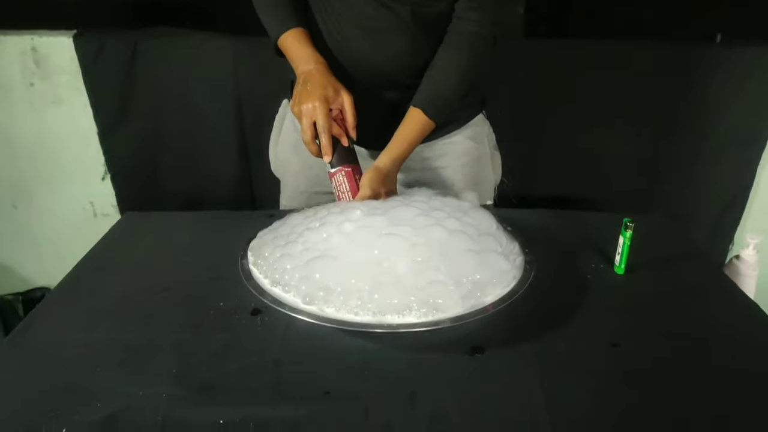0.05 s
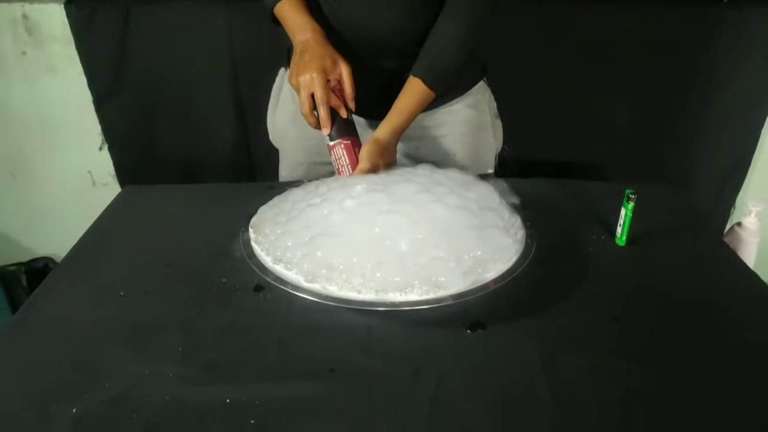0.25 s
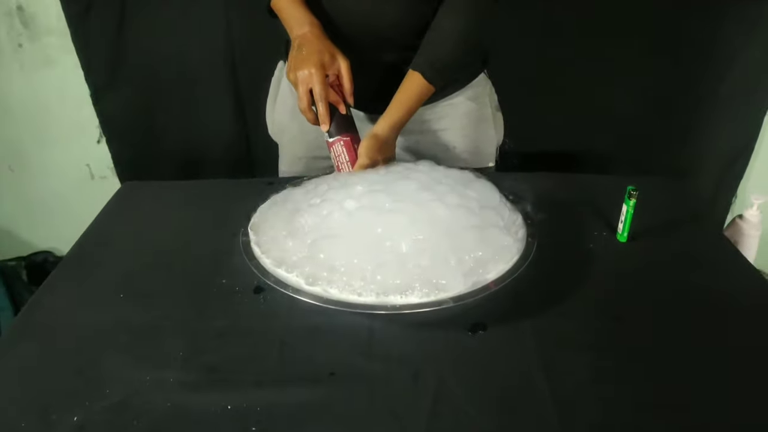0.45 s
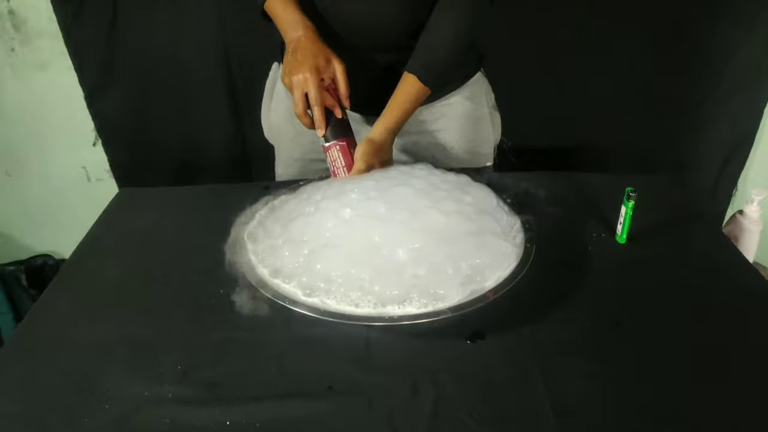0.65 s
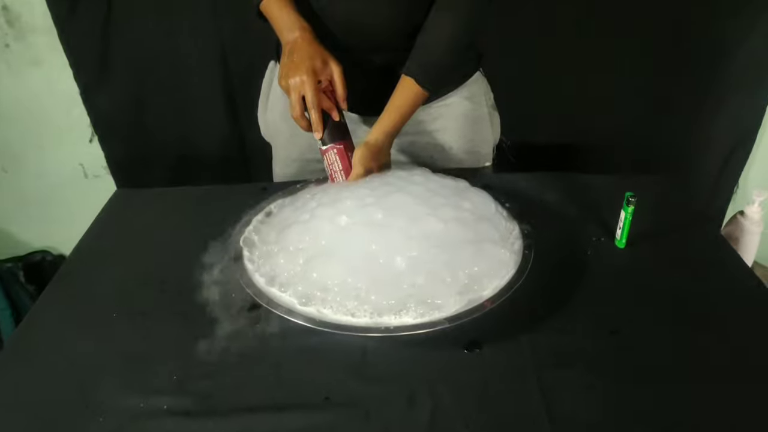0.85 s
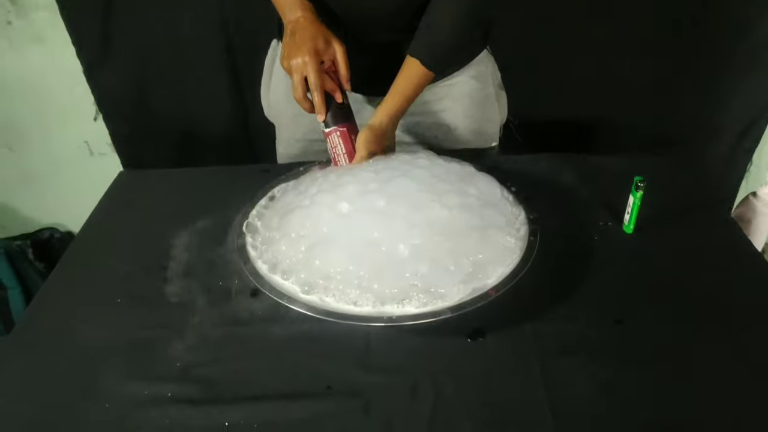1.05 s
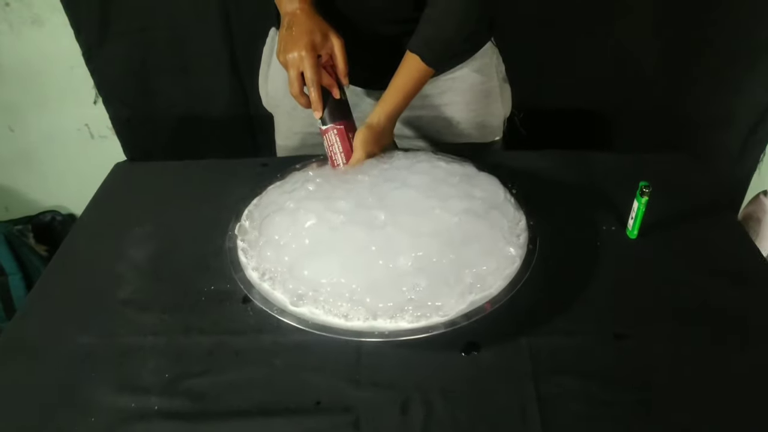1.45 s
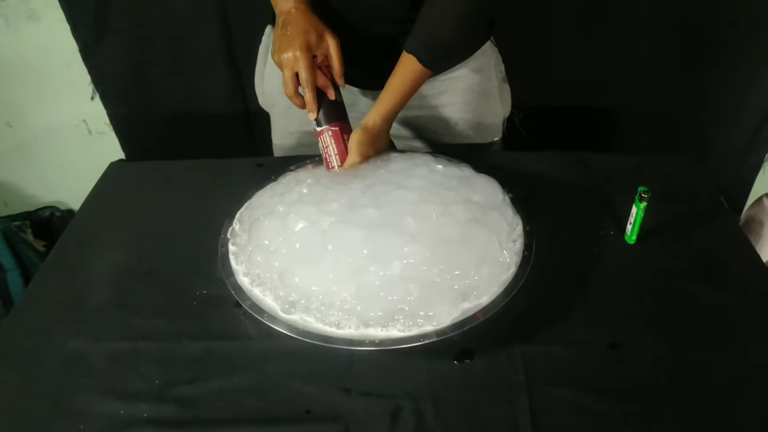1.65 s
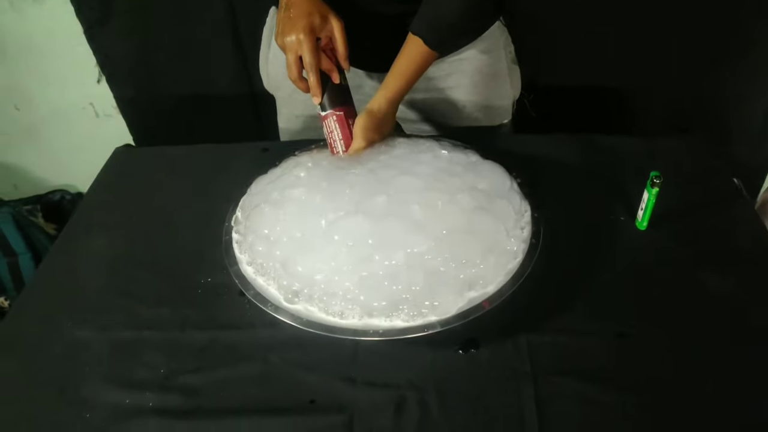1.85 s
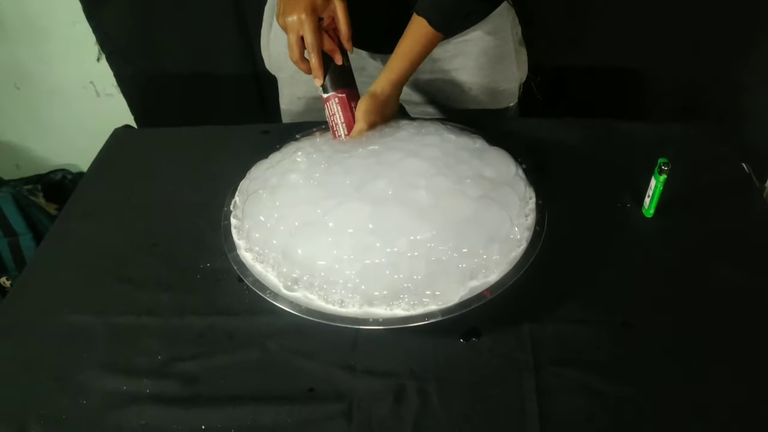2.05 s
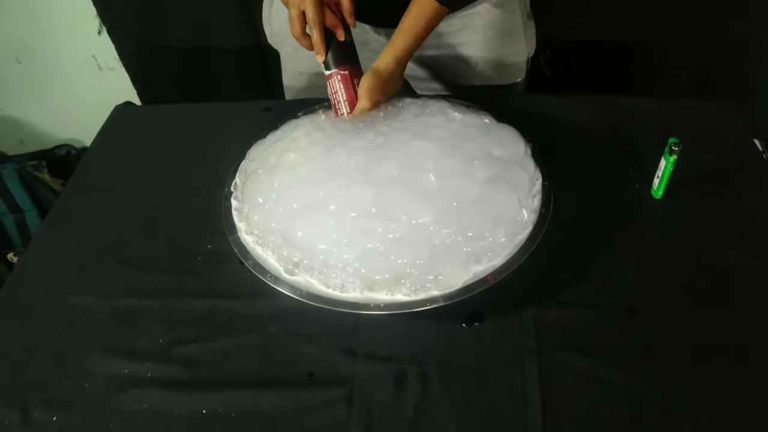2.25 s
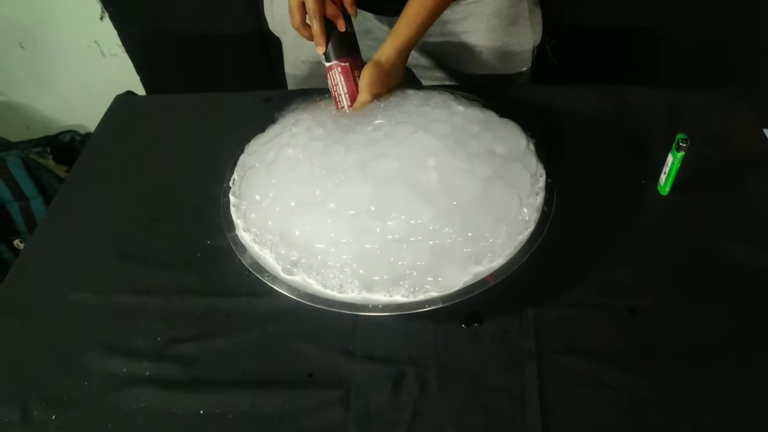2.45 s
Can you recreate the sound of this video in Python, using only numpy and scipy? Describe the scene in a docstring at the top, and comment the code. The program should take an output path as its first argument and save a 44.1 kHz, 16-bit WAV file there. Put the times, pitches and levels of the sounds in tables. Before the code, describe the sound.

Dense bubbling gurgle as gas from a can blows into a tray of soapy foam.

```python
"""A dense gurgle of bubbles, blown by gas from a can held nozzle down in a tray of soapy foam.
The jet hisses first, then its puffs ring a gas pocket under the foam while bubbles of all sizes
churn and glug. Now and then the gas spurts through the surface with a falling squelch.
Soap films pop, and the collapsing foam keeps fizzing after the gas stops.
The small room adds a short, dull tail and a faint rumble."""
import sys
import numpy as np
from scipy import signal
from scipy.io import wavfile
from scipy.ndimage import uniform_filter1d

SR = 44100
rng = np.random.default_rng(int(sys.argv[2]) if len(sys.argv) > 2 else 0)


def generate_wav(signal):
    """Clip the signal to [-1, 1] and save it as 16-bit WAV at the path in sys.argv[1]."""
    frames = np.transpose(np.atleast_2d(signal))
    scaled = np.clip(frames, -1, 1) * 32767
    pcm = np.round(scaled).astype(np.int16)
    wavfile.write(sys.argv[1], SR, pcm)


N = 114660
T = np.arange(N) / SR

# Envelopes are fader rides, colours are EQ curves; all their levels are relative.
# swells of the large bubbles and the gas pocket: (time [s], level [dB])
GURGLE_ENVELOPE = [(0.23, -53), (0.26, -28.5), (0.29, -21), (0.46, -21), (0.47, -24), (0.6, -21.5),
                   (0.63, -25.5), (0.68, -20.5), (0.72, -30.5), (0.77, -23.5), (0.81, -30), (0.88, -23),
                   (0.91, -33.5), (0.96, -28), (0.97, -24), (1.01, -39.5), (1.04, -20.5), (1.07, -44),
                   (1.1, -24.5), (1.15, -31.5), (1.22, -20), (1.3, -24), (1.32, -19), (1.34, -25.5),
                   (1.36, -19), (1.44, -31.5), (1.48, -23), (1.5, -35), (1.53, -26), (1.54, -40),
                   (1.7, -33.5), (1.72, -43), (1.75, -30.5), (1.86, -28), (1.88, -34), (1.92, -27),
                   (1.93, -28.5), (2.3, -23.5), (2.34, -27), (2.36, -47), (2.38, -42), (2.41, -65)]
# round body of the large bubbles: (frequency [Hz], level [dB])
GURGLE_EQ = [(220, -22), (310, -8), (400, -1.5), (470, -4.5), (560, 3.5), (660, -3), (760, -3.5)]
# resonances of the gas pocket under the foam: (centre pitch [Hz], relative level [dB], t60 [s])
POCKET_MODES = [(407, -0.5, 0.026), (553.5, 1, 0.035), (688, -7.5, 0.058), (990, -13, 0.02)]
# single large bubbles: (time [s], level [dB], starting pitch [Hz], t60 [s])
GLUG_CUES = [(0.124, -29, 614, 0.025), (0.278, -18, 620, 0.039), (0.667, -18, 550, 0.032),
             (0.871, -15.5, 536, 0.065), (0.970, -13.5, 590, 0.031), (1.312, -22, 544, 0.088),
             (1.359, -14, 600, 0.054), (1.642, -21, 760, .035), (1.693, -23, 754, 0.02),
             (2.143, -15.5, 793, 0.035), (2.262, -15, 435, 0.15), (2.375, -25, 614, 0.036)]
# surges of the middle-sized bubbles: (time [s], level [dB])
BURBLE_ENVELOPE = [(0.19, -61), (0.27, -33), (0.42, -26), (0.45, -38), (0.49, -27), (0.64, -30.5),
                   (0.7, -34.5), (0.75, -26), (0.8, -46), (0.89, -30), (1.04, -33.5), (1.07, -43.5),
                   (1.12, -30.5), (1.14, -49), (1.16, -33.5), (1.28, -29.5), (1.33, -40), (1.35, -28),
                   (1.38, -37), (1.52, -33), (1.54, -55), (1.65, -39), (1.8, -44.5), (1.83, -28.5),
                   (1.86, -40), (1.9, -30.5), (1.94, -49), (1.99, -31), (2.12, -45), (2.14, -33),
                   (2.18, -37), (2.29, -30), (2.38, -45.5), (2.41, -65)]
# midrange of those bubbles: (frequency [Hz], level [dB])
BURBLE_EQ = [(760, 5), (1030, 6), (1160, -6.5), (1330, -7.5)]
# churn of the small bubbles around the nozzle: (time [s], level [dB])
FROTH_ENVELOPE = [(0.15, -81), (0.22, -37), (0.32, -29), (0.33, -27.5), (0.37, -37.5), (0.38, -26),
                  (0.41, -32.5), (0.52, -30), (0.53, -37), (0.56, -29), (0.64, -37.5), (0.65, -31.5),
                  (0.71, -45), (0.74, -32), (0.99, -38.5), (1.03, -29.5), (1.07, -49), (1.09, -44),
                  (1.11, -33.5), (1.14, -45), (1.26, -34.5), (1.43, -40.5), (1.45, -33), (1.47, -47),
                  (1.52, -35), (1.53, -61.5), (1.55, -46), (1.58, -57.5), (1.74, -40), (1.75, -39.5),
                  (1.8, -44), (1.82, -38), (1.95, -43.5), (1.96, -34.5), (1.99, -44.5), (2.03, -34.5),
                  (2.05, -43), (2.2, -33), (2.21, -50), (2.23, -36.5), (2.32, -38), (2.42, -73.5)]
# bright edge of the small bubbles: (frequency [Hz], level [dB])
FROTH_EQ = [(1100, -3), (1400, -4), (1750, 3), (2100, -1.5), (2700, -7.5), (3200, -8.5), (3700, -16)]
# gas breaking the surface: (time [s], level [dB], starting pitch [Hz], length [s])
SPURT_CUES = [(0.177, -42.5, 1900, 0.014), (0.315, -29, 1913, 0.037), (0.372, -32, 1870, 0.017),
              (0.546, -27, 1850, 0.037), (0.805, -37, 1983, .025), (0.868, -32, 2590, 0.016),
              (0.935, -37, 2570, 0.02), (1.015, -35, 2240, .035), (1.102, -35.5, 2300, 0.015),
              (1.267, -36.5, 2500, .03), (1.341, -31, 1210, 0.024), (1.436, -31, 1950, 0.021),
              (1.45, -32, 1150, 0.01), (1.5, -38, 1855, 0.015), (1.511, -35, 2430, 0.015),
              (1.537, -47, 1880, .033), (1.745, -35, 2100, 0.0085), (1.76, -38, 2410, 0.015),
              (1.811, -36, 2070, 0.025), (2.023, -36, 1770, 0.013), (2.178, -36.5, 2020, .028)]
# push of the gas jet: (time [s], level [dB])
JET_ENVELOPE = [(0.122, -94), (0.131, -65.5), (0.17, -59), (0.22, -44), (0.265, -41), (0.30, -47),
                (0.45, -46), (0.58, -49), (0.66, -50), (0.71, -55), (0.75, -48.5), (0.81, -48), (0.88, -48),
                (0.93, -51), (1.04, -49), (1.07, -53.5), (1.11, -48), (1.17, -50.5), (1.39, -48),
                (1.52, -56), (1.54, -66), (1.65, -66), (1.73, -54.5), (1.79, -56), (1.84, -53.5),
                (1.89, -54.5), (2.02, -55), (2.2, -51.5), (2.32, -53.5), (2.37, -77), (2.41, -87)]
# airy hiss of the jet: (frequency [Hz], level [dB])
JET_EQ = [(900, -9.5), (1800, -1.5), (2700, 1.5), (4000, 0), (5300, 0), (6200, -4), (8000, -7.5),
          (10000, -16.5), (12000, -21), (13000, -31), (14500, -34)]
# soap films bursting: (time [s], level [dB], pitch [Hz])
POP_CUES = [(0.035, -54.5, 7500), (0.780, -32.5, 7600), (0.796, -41.5, 8200), (1.051, -51, 11000),
            (1.738, -41, 7850), (1.834, -35.5, 8650), (1.849, -47, 9800), (1.963, -31.5, 6100),
            (1.994, -35, 4500), (2.227, -24.5, 2920), (2.277, -35, 7600), (2.348, -39.5, 5900),
            (2.355, -34.5, 5060), (2.375, -50, 10500), (2.403, -46, 7600), (2.411, -40.5, 3340),
            (2.427, -41, 2420), (2.444, -39, 5300), (2.471, -43.5, 4730)]
# bed of collapsing foam: (time [s], level [dB])
FIZZ_ENVELOPE = [(0.12, -85), (0.3, -53), (1.5, -58.5), (2.0, -60), (2.42, -55.5), (2.5, -59.5),
                 (2.6, -61.5)]
# sparkle of the tiny bubbles: (frequency [Hz], level [dB])
FIZZ_EQ = [(1100, 7), (2000, 7), (3000, 3.5), (5500, -6), (8000, -5.5), (10000, -12), (12000, -22)]
# rise and fall of the room's rumble: (time [s], level [dB])
RUMBLE_ENVELOPE = [(0, -47), (0.2, -46), (0.45, -39), (0.7, -41.5), (1.1, -39.5), (1.6, -43), (2.3, -40.5),
                   (2.6, -53)]
# low weight of the rumble: (frequency [Hz], level [dB])
RUMBLE_EQ = [(20, -9), (44, 1.5), (80, -5), (120, -8), (200, -11), (400, -19), (700, -20), (1500, -30.5),
             (4000, -47.5), (10000, -57)]


def gurgle():
    """The body of the sound: large bubbles break away while the gas pocket rings."""
    pocket = from_db(-0.5) * gas_pocket()
    loose = bubbles(GURGLE_EQ, per_s=450, ring_cycles=24.4, swell_cycles=1.7, spread_db=3, glide=0.22)
    return from_db(-0.74) * fader(GURGLE_ENVELOPE) * steady(loose + pocket)


def gas_pocket(puffs_per_s=140, jitter=.35, flicker_db=4.94, wander_share=.05):
    """Uneven puffs ring a pocket of gas, muffled by the foam above it; rms 1."""
    gaps_s = np.exp(jitter * rng.standard_normal(1000)) / puffs_per_s
    onsets = (np.cumsum(gaps_s) * SR).astype(int)
    puffs = np.bincount(onsets[onsets < N], minlength=N)
    modes = 0
    for k, (hz, db, t60) in enumerate(POCKET_MODES):
        modes += (-1) ** k * from_db(db + flicker_db * drift(hz=29.5)) * ring(puffs, hz, t60)
    muffled = bandpass(modes, 297, 960)
    # varispeed: the pitch wanders as the pocket swells and shrinks
    warped_time = np.cumsum(1 + wander_share * drift(hz=13.99)) / SR
    return rms_one(np.interp(warped_time, T, muffled, right=0))


def glugs(attack_s=0.0013, rise_share_per_s=1.1):
    """Now and then one large bubble rings out, bending up in pitch as it nears the surface."""
    out = 0
    for start, db, hz, t60 in GLUG_CUES:
        age = np.clip(T - start, 0, 2 * t60)
        tone = np.sin(2 * np.pi * hz * age * (1 + rise_share_per_s * age / 2))
        out += from_db(db - 60 * age / t60) * fade_in(age, attack_s) * tone
    return out


def burble():
    """Middle-sized bubbles fill the mids in surges of their own."""
    swarm = bubbles(BURBLE_EQ, per_s=420, ring_cycles=34.8, swell_cycles=2.25, spread_db=3, glide=0.26)
    return from_db(-0.5) * fader(BURBLE_ENVELOPE) * steady(swarm)


def froth():
    """Small bubbles churn around the nozzle, a bright, wet layer on top."""
    swarm = bubbles(FROTH_EQ, per_s=1300, ring_cycles=45.5, swell_cycles=7.1,
                    spread_db=2.5, glide=-0.098)
    return from_db(-2) * fader(FROTH_ENVELOPE) * steady(swarm)


def spurts(fall_octaves_per_s=7.3, width_hz=170):
    """Squelches: gas sings in a swelling hollow of the foam, so the pitch dives."""
    out, rasp_cos, rasp_sin = 0, drift(width_hz), drift(width_hz)
    for start, db, hz, length in SPURT_CUES:
        age = np.clip(T - start, 0, length)
        phase = 2 * np.pi * np.cumsum(hz * 2 ** (-fall_octaves_per_s * age)) / SR
        breathy_tone = rasp_cos * np.cos(phase) + rasp_sin * np.sin(phase)
        out += from_db(db) * np.sin(np.pi * age / length) * breathy_tone
    return out


def jet(trim_db=2.5, flutter_db=1.5):
    """The hiss flutters as foam closes over the nozzle and is blown clear."""
    flutter = from_db(trim_db + flutter_db * drift(hz=82))
    return flutter * fader(JET_ENVELOPE) * banded_noise(JET_EQ, flicker_db=3.2)


def pops(attack_s=0.0004, t60=0.011, edge_ratio=1.095):
    """Single soap films burst, each with a brief, faintly pitched tick."""
    out, noise = 0, rng.standard_normal(N)
    for start, db, hz in POP_CUES:
        age = np.maximum(T - start, 0)
        tick = steady(bandpass(noise, hz / edge_ratio, hz * edge_ratio), span_s=.002)
        out += from_db(db - 60 * age / t60) * fade_in(age, attack_s) * tick
    return out


def fizz():
    """Fresh foam keeps collapsing in countless tiny bubbles; the tiniest merge into a hush."""
    grains = bubbles(FIZZ_EQ, per_s=2000, ring_cycles=52, swell_cycles=1.7, spread_db=7.5)
    hush = from_db(-2) * banded_noise(FIZZ_EQ, flicker_db=3.5, count=12)
    return fader(FIZZ_ENVELOPE) * (grains + hush)


def room(sound, t60=0.091, predelay_s=.004, damping_hz=4350):
    """The small room answers with a short, dull tail."""
    tail = rng.standard_normal(N) * from_db(-60 * T / t60) * (T > predelay_s)
    tail = signal.sosfilt(signal.butter(1, damping_hz, fs=SR, output="sos"), tail)
    return signal.fftconvolve(sound, tail / np.linalg.norm(tail))[:N]


def rumble():
    """Faint, low room tone under everything."""
    return fader(RUMBLE_ENVELOPE) * banded_noise(RUMBLE_EQ, flicker_db=2.5)


def bubbles(eq, per_s, ring_cycles, swell_cycles, spread_db, glide=0, pool=6000):
    """Randomly born bubbles swell, then ring down 60 dB as their pitch bends by the share `glide`."""
    draws, out = rng.random((pool, 5)), np.zeros(N + SR)
    born = draws[:, 0] < per_s * N / SR / pool
    low_hz, high_hz = eq[0][0], eq[-1][0]
    for _, when, pitch, strength, start_phase in draws[born]:
        hz = low_hz * (high_hz / low_hz) ** pitch
        cycles = np.arange(int(ring_cycles / hz * SR)) * hz / SR
        accent_db = spread_db * min(-np.log(1 - strength), 3)  # a few stand out
        gain = hz * from_db(at_hz(eq, hz) + accent_db)
        shape = fade_in(cycles, swell_cycles) * from_db(-60 * cycles / ring_cycles)
        tone = np.sin(2 * np.pi * (start_phase + cycles * (1 + glide / 2 * cycles / ring_cycles)))
        onset = int(when * N)
        out[onset:onset + len(cycles)] += gain * shape * tone
    return rms_one(out[:N])


def banded_noise(eq, flicker_db, count=24):
    """Noise in bands, each flickering by itself; rms 1."""
    edges = np.geomspace(eq[0][0], eq[-1][0], count + 1)
    white, out = rng.standard_normal((2, N)), 0
    for k, (low, high) in enumerate(zip(edges, edges[1:])):
        band_db = at_hz(eq, np.sqrt(low * high)) + flicker_db * drift(hz=42)
        out += from_db(band_db) * bandpass(white[k % 2], low, high)
    return rms_one(out)


def ring(clicks, hz, t60):
    """A unit click sets a decaying sine ringing."""
    radius, angle = 10 ** (-3 / (t60 * SR)), 2 * np.pi * hz / SR
    return signal.lfilter([0, np.sin(angle)], [1, -2 * radius * np.cos(angle), radius ** 2], clicks + 1e-18)


def drift(hz):
    """Smooth random modulation, mostly slower than `hz`; rms 1."""
    pole = np.exp(-2 * np.pi * hz / SR)
    wander = signal.lfilter([1], [1, -2 * pole, pole * pole], rng.standard_normal(N + SR))
    return rms_one(wander[SR:])


def steady(x, span_s=.016):
    """Leveller: evens out slow swings, as a constant feed of gas does."""
    power = np.abs(uniform_filter1d(x ** 2, int(span_s * SR)))
    return x / np.sqrt(power + 1e-12)


def fader(envelope):
    """Gain over time, fading at 300 dB a second beyond the envelope's ends."""
    times, db = np.transpose(envelope)
    outside_s = np.maximum(0, np.maximum(times[0] - T, T - times[-1]))
    return from_db(np.interp(T, times, db) - 300 * outside_s)


def fade_in(age, attack):
    """A rounded attack from 0 to 1."""
    return 1 - np.exp(-(age / attack) ** 2)


def at_hz(eq, hz):
    """Read an EQ curve in dB on a log-frequency axis."""
    freqs, db = np.transpose(eq)
    return np.interp(np.log(hz), np.log(freqs), db)


def bandpass(x, low_hz, high_hz):
    """Keep one band, with gentle skirts."""
    return signal.sosfilt(signal.butter(2, [low_hz, high_hz], "band", fs=SR, output="sos"), x)


def from_db(db):
    """Decibels to gain."""
    return 10 ** (np.asarray(db) / 20)


def rms_one(x):
    """Scale to rms 1."""
    return x / np.sqrt(np.mean(x ** 2) + 1e-20)


def scene(reverb_db=-17.5):
    """Mono mix: the tray up front, the rumble and the room's tail behind."""
    tray = gurgle() + burble() + froth() + jet() + spurts() + glugs() + pops() + fizz()
    return (tray + rumble() + from_db(reverb_db) * room(tray))[None]


def record(dry, rolloff_hz=12100, stop_hz=15000):
    """The microphone rolls off the highs, and a steep filter cuts the very top."""
    dull = signal.sosfilt(signal.butter(8, rolloff_hz, fs=SR, output="sos"), dry)
    return signal.sosfilt(signal.cheby2(14, 70, stop_hz, fs=SR, output="sos"), dull)


dry = scene()
out = record(dry)
generate_wav(out)
```